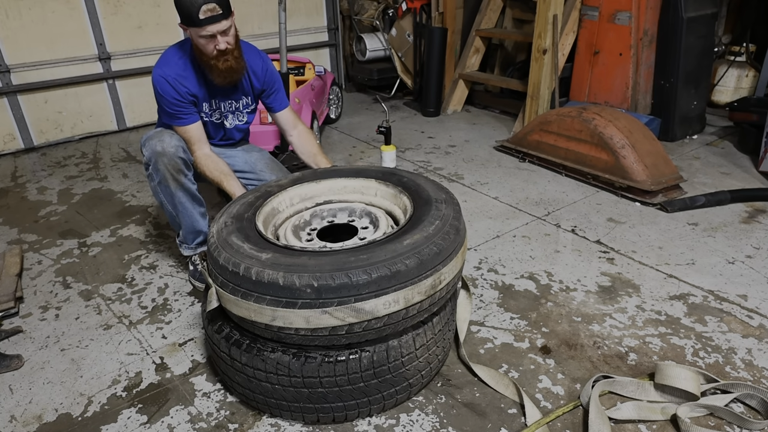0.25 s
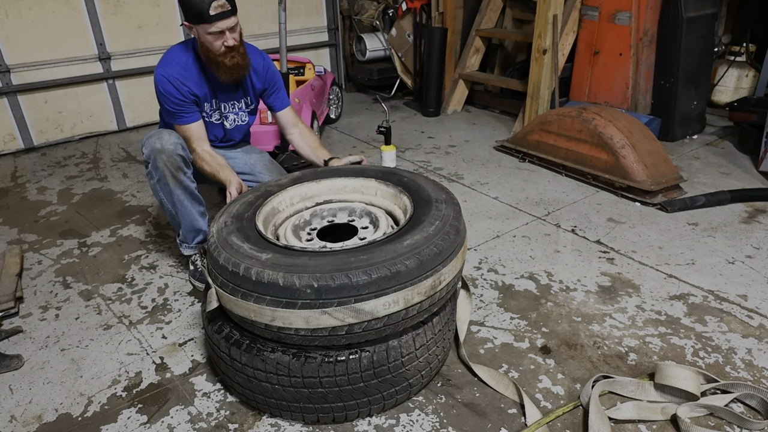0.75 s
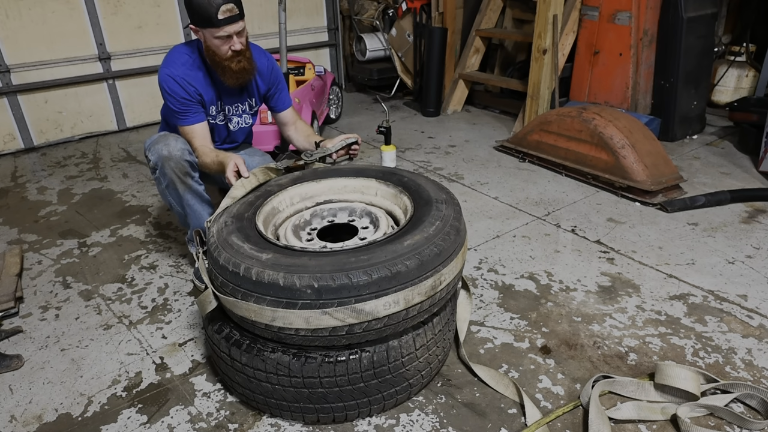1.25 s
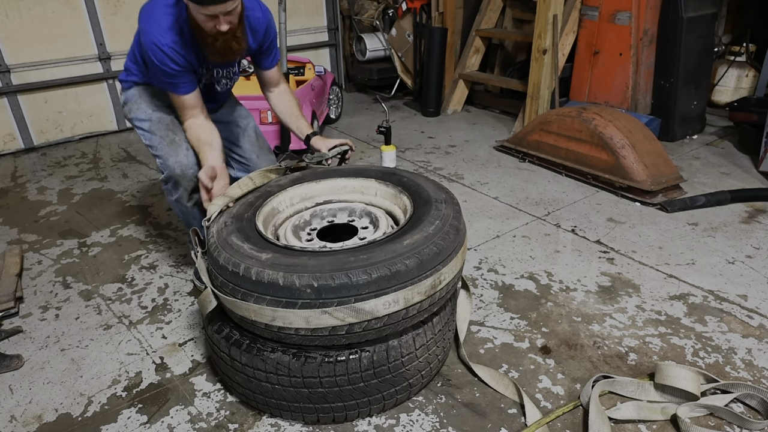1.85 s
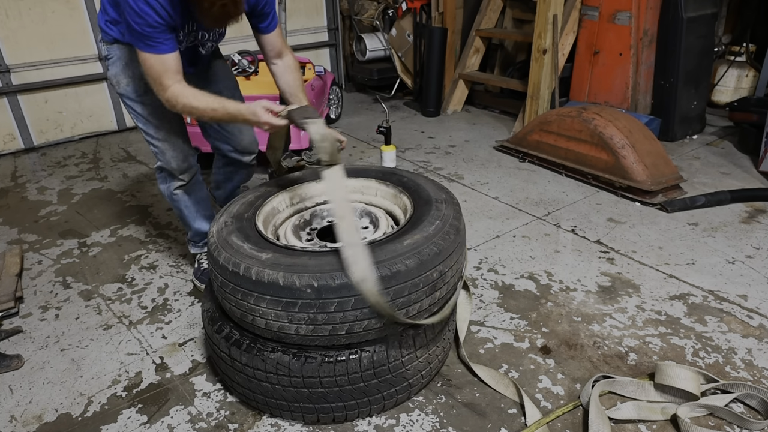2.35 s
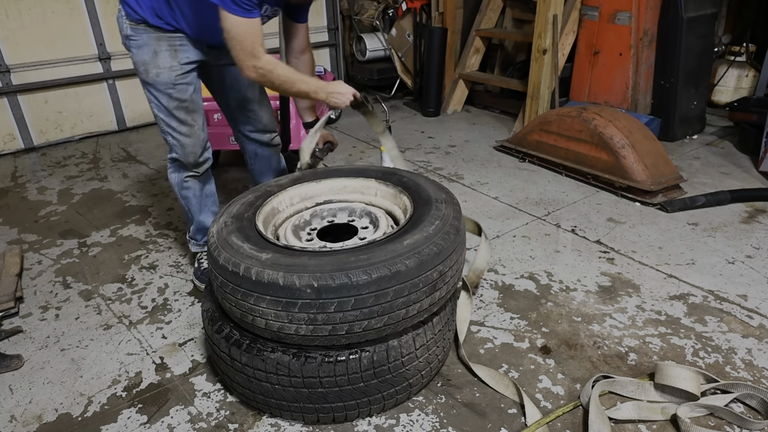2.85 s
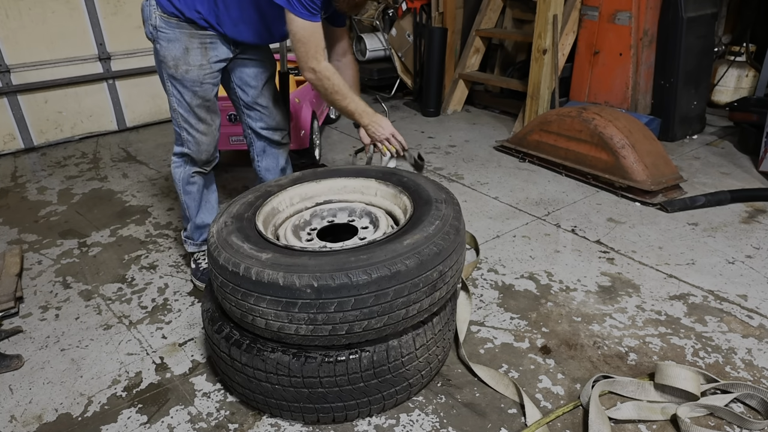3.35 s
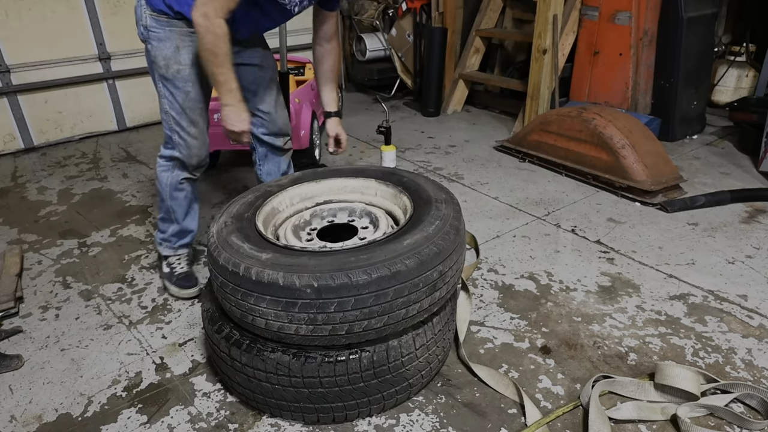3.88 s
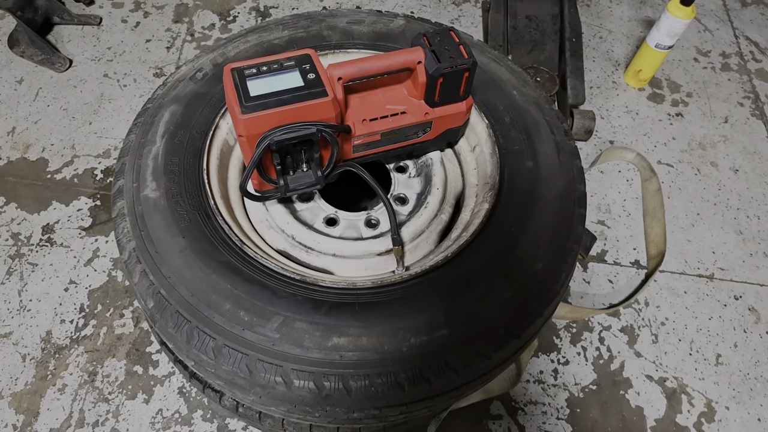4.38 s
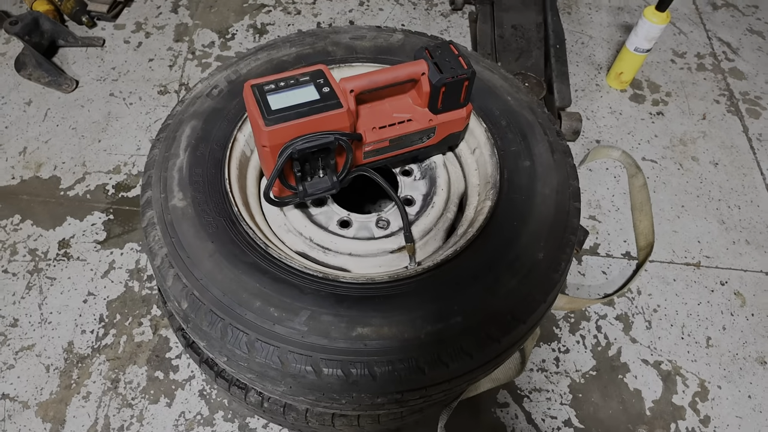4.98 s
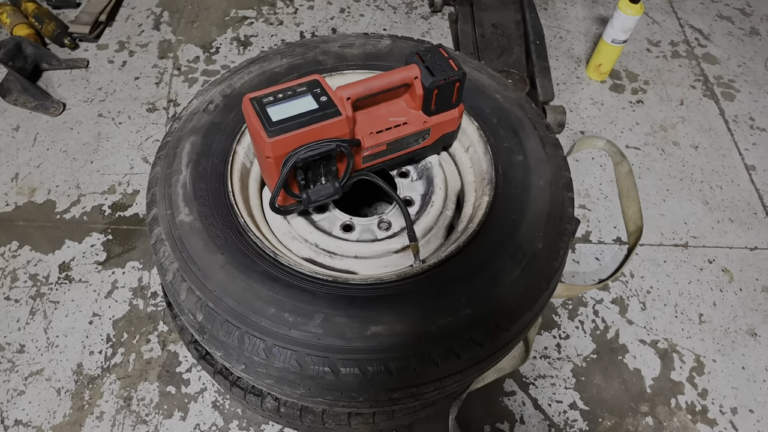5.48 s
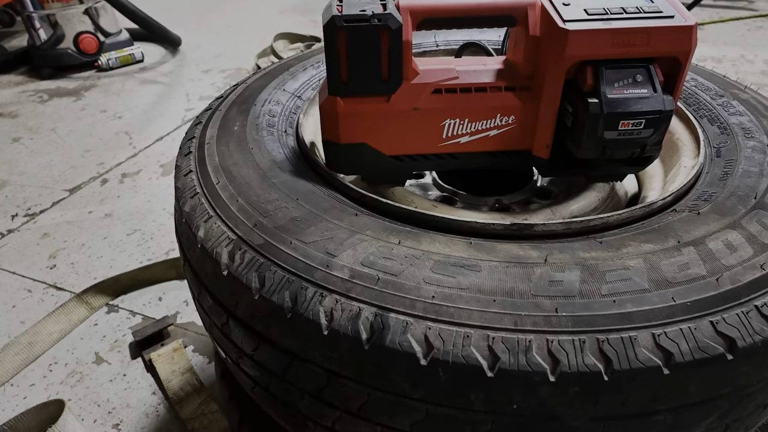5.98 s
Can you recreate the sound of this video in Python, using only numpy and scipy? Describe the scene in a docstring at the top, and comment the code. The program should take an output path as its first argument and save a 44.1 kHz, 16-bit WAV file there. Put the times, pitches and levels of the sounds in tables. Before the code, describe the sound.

In a workshop, close and fairly dry, strap webbing rubs and rasps against a tire in short tugs with dry snaps. A steel buckle clanks in quick clusters, hooks chink and scrape, then the metal drops hard on concrete, bouncing and ringing. After a tiny silence a piston inflator drones steadily, cuts briefly, and resumes from another angle. Sound sits strongly to the left.

```python
"""Webbing and clothes rustle as a ratchet strap is pulled off a tire in a workshop, with dry snaps of a fold.
Low thumps sound on tire and floor, the steel buckle clanks and scrapes, and two hooks chink and ring:
struck modes, one brief and one long. After a moment of silence a piston inflator drones, a stack of crank
harmonics over rushing air and whine, heard from above and, after a short gap, from the side.
The left carries the direct sound with a little room; the weaker right, direct bass and diffuse room sound."""
import sys
import numpy as np
from scipy import signal
from scipy.fft import rfft, irfft, next_fast_len
from scipy.io import wavfile
from scipy.ndimage import uniform_filter1d

SR = 44100
rng = np.random.default_rng(int(sys.argv[2]) if len(sys.argv) > 2 else 0)


def bounce(signal):
    """Save signal as a 16-bit WAV file at the path given by the first command-line argument."""
    frames = np.transpose(np.atleast_2d(signal))
    limited = np.clip(frames, -1, 1)
    pcm = np.round(limited * 32767).astype(np.int16)
    wavfile.write(sys.argv[1], SR, pcm)


N = 274743
TIME = np.arange(N) / SR   # [s]


def from_db(db):
    """Decibels to gain."""
    return 10 ** (np.asarray(db) / 20)


def rms_one(x):
    """Scale to rms 1."""
    return x / np.sqrt(np.mean(x ** 2) + 1e-20)


def during(span):
    """1 from the start of a span [s] to its end, else 0, with soft edges."""
    start, end = span
    return uniform_filter1d(1. * ((TIME >= start) & (TIME <= end)), size=128)


def at_hz(points, hz):
    """Read a spectrum on a log-frequency axis."""
    f, value = np.transpose(points)
    return np.interp(np.log(np.maximum(hz, 1)), np.log(f), value)


def colour(x, points):
    """Filter by a spectrum in dB."""
    size = next_fast_len(N + 8192)
    gain = from_db(at_hz(points, np.fft.rfftfreq(size, 1 / SR)))
    return irfft(rfft(x, size) * gain, size)[:N]


def drift(rate):
    """Slow random wander of rms 1, through 'rate' random points per second."""
    knots = rng.standard_normal(4096)
    return rms_one(np.interp(TIME * rate, np.arange(len(knots)), knots))


def grains(per_s, spread_db):
    """Random clicks of uneven size and either sign, rms 1."""
    sizes = from_db(spread_db * np.minimum(rng.exponential(1, N), 4))
    signs = rng.choice([-1, 1], N)
    return rms_one(sizes * signs * (rng.random(N) < per_s / SR))


def ring(clicks, hz, t60):
    """A damped resonance: a unit click sets a sine of height 1 ringing."""
    r = from_db(-60 / (t60 * SR))   # decay per sample
    w = 2 * np.pi * hz / SR
    return signal.lfilter([0, np.sin(w)], [1, -2 * r * np.cos(w), r * r], clicks + 1e-18)


def lowpass(x, hz):
    """Soften the top, 12 dB per octave."""
    return signal.sosfilt(signal.butter(2, hz, fs=SR, output="sos"), x)


def narrow_noise(hz, width_hz):
    """Noise in one resonance, rms 1."""
    edges = [max(hz - width_hz / 2, 10), hz + width_hz / 2]
    band = signal.butter(2, edges, "band", fs=SR, output="sos")
    return rms_one(signal.sosfilt(band, rng.standard_normal(N)))


def burst(hz, t60, width, order=1):
    """A contact: a dense rattle around one pitch that dies quickly, its envelope starting at rms 1."""
    fade = from_db(-60 * np.arange(SR // 3) / SR / t60)
    span = 1 + abs(width)
    edges = [hz / span, min(hz * span, SR / 2 - 2000)]
    band = signal.butter(order, edges, "band", fs=SR, output="sos")
    x = signal.sosfilt(band, rng.standard_normal(len(fade)) * fade)
    return x * np.sqrt(np.sum(fade ** 2) / np.sum(x ** 2))


def contacts(rows, width, order=1):
    """Lay out a run of bursts: (time [s], level [dB], centre [Hz], t60 [s])."""
    out = np.zeros(N)
    for s, db, hz, t60 in rows:
        part = out[round(s * SR):][:SR // 3]
        part += (from_db(db) * burst(hz, t60, width, order))[:len(part)]
    return out


def swells(rows, drop_db):
    """Gain of strokes (peak s, rise s, fall s, dB): each builds and dies exponentially; powers add."""
    power = np.zeros(N)
    for s, rise, fall, db in rows:
        before = (s - TIME) / max(rise, .005)
        after = (TIME - s) / max(fall, .005)
        away = np.maximum(before, after)   # distance from the peak in rise or fall times
        near = away < 5
        power[near] += from_db(db - drop_db * away[near]) ** 2
    return np.sqrt(power)


def patchy(x, patchy_db, rate):
    """Each third of an octave swells and sinks on its own, as the contact patch changes."""
    centres = 250 * 2 ** (np.arange(14) / 3)
    size = next_fast_len(N)
    spectrum, hz = rfft(x, size), np.fft.rfftfreq(size, 1 / SR)
    out = np.zeros(N)
    for pick in np.eye(len(centres)):
        band = irfft(spectrum * np.interp(hz, centres, pick), size)[:N]
        out += band * from_db(patchy_db * drift(rate))
    return rms_one(out)


STRAP_SPAN = (0, 4.037)   # the strap is handled: (from [s], to [s])
STROKE_DROP_DB, HISS_DROP_DB = 19.5, 13.5   # lost over one rise or fall time; the hiss lingers longer
RUB_REST_DB, RASP_REST_DB, HISS_REST_DB = -59.5, -62.5, -59   # slack webbing between strokes
# the tire booms softly under the strap until it is lifted off
BOOM_HZ, BOOM_DB, BOOM_FOLLOWS, LIFTED_S = 74, -66, .35, 2.21
# tugs and slides of the webbing; near 3.13 and 3.39 s the buckle scrapes and rattles on the floor:
# (peak time [s], rise [s], fall [s], dull rub [dB], rasp [dB], hiss [dB])
STROKES = [(.02, .1, 0.16, -38.5, -36.5, -46.5), (.097, 0.073, 0.053, -31, -35.5, -45.5),
           (.275, 0.12, 0.097, -40.5, -46, -51.5), (.61, 0.12, .06, -46, -43, -46),
           (.645, .025, .06, -42, -28, -40.5), (.705, 0.079, .02, -33.5, -21.5, -37),
           (.868, .075, .055, -39.5, -31, -44), (.942, .035, .06, -42, -42, -51),
           (1.01, .07, 0.16, -49, -35.5, -50), (1.09, 0.1, 0.12, -44.5, -40.5, -42),
           (1.23, .11, .1, -52, -37.5, -44.5), (1.38, 0.083, 0.097, -37, -35, -43.5),
           (1.48, .09, 0.11, -37, -48, -52), (1.607, 0.1, .14, -32.5, -30, -37),
           (1.775, 0.08, .1, -40.5, -35, -44.5), (1.91, 0.2, 0.27, -45.5, -44.5, -45),
           (2.125, 0.081, 0.075, -39, -50, -39.5), (2.178, .025, 0.061, -40, -36, -47),
           (2.39, .1, .1, -51, -58, -51), (2.6, .16, .22, -51, -54, -51),
           (2.94, 0.15, 0.29, -39.5, -35.5, -42), (3.13, .09, 0.097, -39.5, -41, -58),
           (3.39, 0.18, 0.33, -42, -38, -58), (3.73, 0.095, 0.29, -44, -34.5, -42)]
# colour of the dull rub: (frequency [Hz], relative level [dB])
RUB_COLOUR = [(40, -45), (75, -27), (130, -21), (230, -10.5), (330, -2), (520, 4.5), (680, 2.5), (850, 3),
              (1200, -3), (1800, -0.5), (4000, -64)]
# colour of the rasp, mostly of the weave: (frequency [Hz], relative level [dB])
RASP_COLOUR = [(500, -35), (1000, -3), (1400, -1), (2000, 1), (2500, -5.5), (3300, -13), (4500, -22.5),
               (8000, -35)]
# colour of the hiss, mostly of cloth: (frequency [Hz], relative level [dB])
HISS_COLOUR = [(100, -24), (600, -6), (2000, -3.5), (3500, -1), (5800, -0.5), (9000, -8), (11500, -6.5),
               (13500, -10), (16000, -18)]
# dry snaps of webbing and grit: (time [s], level [dB], centre [Hz], t60 [s])
SNAPS = [(.0415, -27, 1800, .02), (.052, -17, 1600, .015), (.080, -18, 1600, .025), (.330, -11, 7700, .007),
         (.3302, -21, 1900, .012), (.344, -32, 2200, .025), (.352, -30, 6000, .02), (.389, -27, 2600, .022),
         (.635, -27, 1700, .08), (.721, -17, 7200, .02), (.845, -26, 2300, .03), (.928, -28, 1900, .03),
         (.951, -15, 7500, .016), (.9515, -24, 1800, .02), (1.348, -22, 1900, .035),
         (1.516, -29, 1800, .015), (1.745, -22, 2200, .035)]


def rubbing(flutter_db=2.0):
    """Threads catch and slip by the thousand, a fold snaps; late on, the buckle scrapes the floor likewise."""
    strokes = np.array(STROKES)

    def moves(column, drop_db, rest_db):
        rows = np.column_stack([strokes[:, :3], strokes[:, column]])
        return np.hypot(swells(rows, drop_db), from_db(rest_db))

    rub = moves(3, STROKE_DROP_DB, RUB_REST_DB)
    rasp = moves(4, STROKE_DROP_DB, RASP_REST_DB)
    hiss = moves(5, HISS_DROP_DB, HISS_REST_DB)
    grip = from_db(flutter_db * drift(130))
    out = rub * grip * patchy(colour(grains(6000, 1.2), RUB_COLOUR), patchy_db=3.5, rate=25)
    out += rasp * grip * patchy(colour(grains(4000, 2.6), RASP_COLOUR), patchy_db=3.0, rate=35)
    out += hiss * rms_one(colour(grains(25000, 1.8), HISS_COLOUR))
    boom = from_db(BOOM_DB) * narrow_noise(BOOM_HZ, width_hz=30)
    out += boom * rms_one(rub) ** BOOM_FOLLOWS * during((0, LIFTED_S))
    return out + lowpass(contacts(SNAPS, width=0.16), 12500)


# soft low thumps, knocks on the tire and later the drop onto the floor:
# (time [s], level [dB], centre [Hz], t60 [s])
THUMPS = [(0.09, -49, 220, .2), (0.952, -52, 120, 0.057), (1.058, -51, 90, 0.35), (2.694, -44, 200, 0.04),
          (3.606, -29.5, 100, 0.019)]


def thumps():
    """Soft bodies and the floor answer knocks with short, low, broad noise bursts."""
    return lowpass(contacts(THUMPS, width=0.8, order=2), 10500)


# low ring of the buckle's handle: it starts with a clank and is damped as it lands
HANDLE_RING_HZ, HANDLE_DB, HANDLE_DAMPED_DB = 386, -42.5, -58.5
HANDLE_STRUCK_S, HANDLE_LANDS_S = 3.2, 3.61
# clanks of the buckle, which also jolt the first hook:
# (time [s], level [dB], centre [Hz], t60 [s], ring of the first hook [dB])
CLANKS = [(1.986, -20, 2740, 0.063, -39.5), (2.161, -27.5, 3300, 0.072, -50),
          (2.184, -20, 3450, 0.064, -42), (2.248, -16, 3140, 0.023, -44.5),
          (2.319, -21, 3130, 0.022, -37.5), (2.428, -15, 3700, 0.019, -41),
          (2.476, -21.5, 2960, 0.031, -53.5), (2.495, -26.5, 3500, 0.05, -42),
          (2.694, -23, 600, 0.034, -70), (2.698, -19.5, 4400, 0.032, -49), (3.099, -19, 1380, 0.025, -46),
          (3.198, -18, 1210, 0.18, -42), (3.201, -24.5, 670, 0.13, -90), (3.315, -21, 1110, 0.17, -33.5),
          (3.607, -8, 1540, 0.023, -49), (3.608, -21, 670, 0.0089, -62), (3.664, -41, 2500, .03, -60),
          (3.683, -35.5, 7000, .04, -65), (3.740, -24, 2000, 0.1, -43), (3.769, -18.5, 5470, 0.023, -38),
          (3.794, -18, 2920, 0.0083, -61), (3.870, -30.5, 5000, .04, -61), (3.935, -26, 1600, 0.13, -60),
          (3.977, -31.5, 1390, 0.18, -46.5)]


def buckle():
    """Loose steel parts clank as short noise bursts, and the handle hums one low tone."""
    handle = from_db(HANDLE_DB) * during((HANDLE_STRUCK_S, HANDLE_LANDS_S))
    handle += from_db(HANDLE_DAMPED_DB) * during((HANDLE_LANDS_S, STRAP_SPAN[1]))
    hum = handle * np.sqrt(2) * np.sin(2 * np.pi * HANDLE_RING_HZ * TIME)
    clanks = contacts([row[:4] for row in CLANKS], width=0.19)
    return lowpass(hum + clanks, 10500)


# first hook scraping along the buckle: (peak time [s], rise [s], fall [s], level [dB])
SCRAPES = [(2.18, .05, .08, -38), (2.38, .2, 0.36, -51), (2.918, .05, .07, -31), (2.97, .06, .14, -36),
           (3.36, .3, .08, -45)]
# modes of the first hook: (frequency [Hz], relative level [dB], t60 [s])
FIRST_HOOK = [(910, -10, .17), (2075, 2, .35), (2148, -1, .18), (3830, -4, .3), (4050, -2, .2),
              (4160, -9, .1), (5890, -10, .26), (6010, -11, .2), (6680, -9, .16), (7700, -6.5, .22),
              (9680, -13, .25), (10480, -19, .16), (12330, -19, .2)]


def first_hook(uneven_db=4.5):
    """It is jolted by each clank and chatters as it drags, ringing briefly in the hand."""
    s, *_, ring_db = np.transpose(CLANKS)
    struck = np.round(s * SR).astype(int)
    drag = swells(SCRAPES, STROKE_DROP_DB)
    out = np.zeros(N)
    for hz, db, t60 in FIRST_HOOK:
        # offset the energy a long ring gathers, so that t60 does not change a mode's scraping level
        clicks = drag * grains(700, 3.5) * np.sqrt(4 * np.log(1000) / (t60 * SR))
        clicks[struck] += from_db(ring_db + rng.normal(0, uneven_db, len(s)))
        swing_db = 4.66 * drift(55)   # it swings, so each mode flutters
        out += from_db(db + swing_db) * ring(clicks, hz, t60)
    return out


SETTLES_S = 3.905   # the second hook leans on the strap, which takes some of its ring
# second hook landing and bouncing: (time [s], ring [dB], favoured frequency [Hz])
BOUNCES = [(3.607, -16, 2150), (3.666, -22.5, 826), (3.735, -17, 7260), (3.795, -14, 4470),
           (3.871, -21, 6840)]
# modes of the second hook: (frequency [Hz], relative level [dB], t60 [s])
SECOND_HOOK = [(889, -5, .9), (2115, 0, 1.1), (3808, -7, .55), (4056, 0, .65), (5943, -15, .35),
               (6123, -9, .35), (6764, -15, .25), (8420, -24, .3), (9720, -18, .25), (12270, -19, .2)]


def second_hook(focus_db=15.5, muffle_db=2.5, buzz=0.31):
    """It falls free and rings long; the spot struck decides which modes speak."""
    s, ring_db, favoured_hz = np.transpose(BOUNCES)
    struck = np.round(s * SR).astype(int)
    out = np.zeros(N)
    for hz, db, t60 in SECOND_HOOK:
        clicks = np.zeros(N)
        octaves_off = np.abs(np.log2(hz / favoured_hz))
        clicks[struck] = from_db(ring_db - focus_db * octaves_off)
        rocking_db = drift(45)   # it rocks as it rings
        rattle = 1 + buzz * drift(260) * min(hz / 4000, 1.5)   # and buzzes on the floor, the high modes most
        out += from_db(db + rocking_db) * rattle * ring(clicks, hz, t60)
    return out * from_db(-muffle_db * np.clip((TIME - SETTLES_S) / 0.046, 0, 1))


# the inflator, from above and from the side: (from [s], to [s]), level [dB], turns of the crank [Hz]
ABOVE_SPAN, ABOVE_DB, CRANK_ABOVE_HZ = (4.086, 5.712), -22.5, 67.44
SIDE_SPAN, SIDE_DB, CRANK_SIDE_HZ = (5.76, 6.24), -22, 67.3
FADE_IN_S, FADE_IN_DB = 0.022, 17


def running(span, db):
    """Gain of the pump: a quick fade in, then steady to an abrupt end."""
    to_go = np.clip(1 - (TIME - span[0]) / FADE_IN_S, 0, 1)
    return from_db(db - FADE_IN_DB * to_go) * during(span)


# hum heard from above and from the side: (multiple of the crank rate, relative level [dB])
HUM_ABOVE = [(1, -30), (2, -27), (3, -29), (4, -12), (5, -4), (6, -5), (7, 0), (8, -5), (9, -5), (10, -5),
             (11, -10), (12, -10), (13, -9), (14, -26), (15, -22), (16, -10), (17, -5), (18, -12), (19, -9),
             (20, -14), (21, -25), (22, -30)]
HUM_SIDE = [(1, -32), (2, -32), (3, -38), (4, -13), (5, -9), (6, -11), (7, -1), (8, 0), (9, -11), (10, -1),
            (11, -15), (12, -11), (13, -13), (14, -14), (15, -20), (16, -10), (17, -10), (18, -13),
            (19, -17), (20, -25), (21, -29), (22, -36)]
# puffs and slaps of the valves in each turn: (time [share of a turn], relative strength)
PUFFS_ABOVE = [(.76, .45), (.865, .5), (.05, 1.0)]
PUFFS_SIDE = [(.03, .55), (.1, 1.0), (.4, .95)]
# buzz of the housing above the hum: (frequency [Hz], relative level [dB])
BUZZ = [(1500, -31), (1620, -22), (1720, -38), (1820, -18), (1950, -31), (2100, -25.5), (2350, -41),
        (2630, -37), (3000, -52), (3900, -50), (4180, -36), (4450, -46), (4660, -37), (4900, -54)]
# rushing air, with the narrow whining bands of the fan: (frequency [Hz], relative level [dB])
AIR = [(30, -26), (220, -18), (520, 0), (950, -1), (1250, 2), (1500, -7.5), (2000, -14.5), (3000, -22.5),
       (4400, -24.5), (5200, -28), (8800, -30), (9250, -21), (9550, -27), (9950, -20.5), (10800, -32),
       (12400, -30), (13200, -26), (14200, -35), (16000, -41)]


def inflator(span, level_db, crank_hz, hum, puffs, buzz_db, air_db, uneven):
    """Valves puff in every turn and ring the housing, no two turns quite alike, over rushing air."""
    live = during(span) > 1e-6
    crank = (crank_hz * TIME + .0008 * drift(50))[live]   # turns, slightly unsteady
    hum_db = dict((round(k), db) for k, db in hum)
    tone, power = np.zeros(len(crank)), 0
    for k in range(1, 75):
        hz = k * crank_hz
        if k in hum_db:
            # the puffs and the two broad resonances of the housing set when each partial peaks
            timing = sum(size * np.exp(-2j * np.pi * k * at) for at, size in puffs)
            for body_hz, width_hz in [(500., 260.), (1150., 300.)]:
                resonance = 1 / (1 + 1j * (hz ** 2 - body_hz ** 2) / (hz * width_hz))
                timing = timing * (resonance + 0.15)
            gain, phase = from_db(hum_db[k]), np.angle(timing)
        else:
            # the high buzz comes from many panels, out of step with each other
            gain, phase = from_db(at_hz(BUZZ, hz) + buzz_db), rng.uniform(0, 2 * np.pi)
        tone += gain * np.cos(2 * np.pi * k * crank + phase)
        power += gain ** 2 / 2
    tone *= (1 + uneven * drift(130)[live]) / np.sqrt(power)
    # the air gushes just after each puff
    gush = 1.0 + sum(size * np.exp(3 * (np.cos(2 * np.pi * (crank - at - .06)) - 1)) for at, size in puffs)
    air = rms_one(colour(rng.standard_normal(N), AIR))[live]
    out = np.zeros(N)
    out[live] = tone + from_db(air_db) * rms_one(gush) * air
    return out * running(span, level_db)


# whine of the motor and its fan, levels relative to the pump:
# (centre [Hz], width [Hz], level from above [dB], level from the side [dB])
WHINE = [(4150, 90, -44, -40), (4640, 90, -41, -50), (9250, 160, -48, -62), (9950, 300, -47, -45),
         (13400, 500, -54, -40)]


def whine():
    """Narrow wavering bands; which ones carry depends on the side that faces the listener."""
    above, side = running(ABOVE_SPAN, ABOVE_DB), running(SIDE_SPAN, SIDE_DB)
    out = np.zeros(N)
    for hz, width_hz, above_db, side_db in WHINE:
        gain = above * from_db(above_db) + side * from_db(side_db)
        out += narrow_noise(hz, width_hz) * gain
    return out


ROOM_T60_S = 0.32


def workshop(x):
    """Diffuse reflections off floor, walls and clutter: a decaying noise tail, energy 1."""
    age = np.arange(SR // 2) / SR
    tail = rng.standard_normal(len(age)) * from_db(-60 * age / ROOM_T60_S) * (age > .003)
    return signal.fftconvolve(x, tail / np.sqrt(np.sum(tail ** 2)))[:N]


# share of direct sound that bends round to the right side: (frequency [Hz], level [dB])
BENDING = [(30, -6), (180, -6), (700, -9), (1500, -39)]
# how far the right side is turned down: (frequency [Hz], cut [dB])
STRAP_BALANCE = [(60, 12), (150, 10), (380, 13), (950, 21), (2380, 16), (5980, 16.5), (15000, 13.5)]
PUMP_BALANCE = [(60, 7.8), (130, 11.5), (290, 14), (640, 30), (1410, 25.5), (3100, 12.3), (6820, 12.5),
                (15000, 13.4)]


def place(x, balance, wet_db):
    """Direct sound with a little room on the left; on the weak right, direct bass and diffuse treble."""
    diffuse = colour(workshop(x), [(150, -14), (600, -1), (1500, 0)])
    right = colour(colour(x, BENDING) + diffuse, [(hz, -db) for hz, db in balance])
    left = x + from_db(wet_db) * workshop(x)
    return np.array([left, right])


def scene():
    """The strap comes off, then the pump runs; each stretch ends abruptly, room and all."""
    handling = rubbing() + thumps() + buckle() + first_hook() + second_hook()
    strap = place(handling, STRAP_BALANCE, wet_db=-21) * during(STRAP_SPAN)
    above = inflator(ABOVE_SPAN, ABOVE_DB, CRANK_ABOVE_HZ, HUM_ABOVE, PUFFS_ABOVE,
                     buzz_db=-2.5, air_db=-19, uneven=0.027)
    side = inflator(SIDE_SPAN, SIDE_DB, CRANK_SIDE_HZ, HUM_SIDE, PUFFS_SIDE,
                    buzz_db=-10, air_db=-18.5, uneven=0.018)
    pump = place(above + side + whine(), PUMP_BALANCE, wet_db=-28)
    pump = pump * (during(ABOVE_SPAN) + during(SIDE_SPAN))
    return from_db(5.0) * (strap + pump)


def record(dry):
    """Peaks clip at full scale, then a steep filter cuts the top, 70 dB down from 17 kHz."""
    top_cut = signal.cheby2(16, 70, 17000, fs=SR, output="sos")
    return signal.sosfilt(top_cut, np.clip(dry, -1, 1))


dry = scene()
out = record(dry)
bounce(out)
```